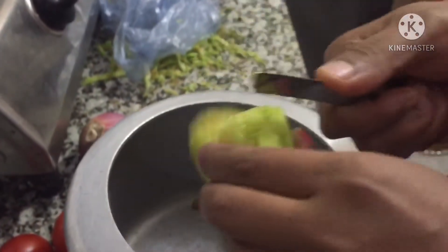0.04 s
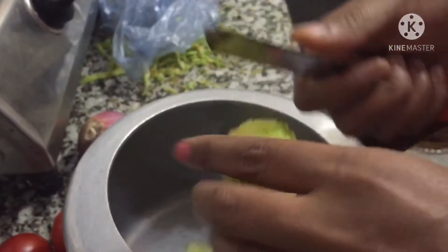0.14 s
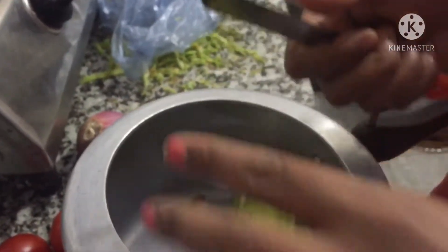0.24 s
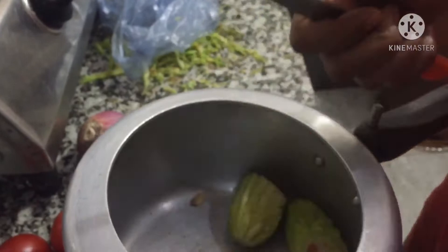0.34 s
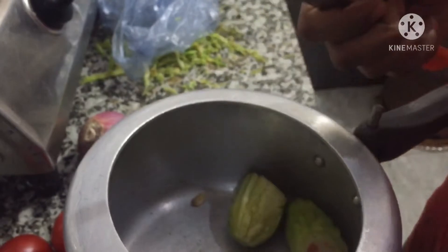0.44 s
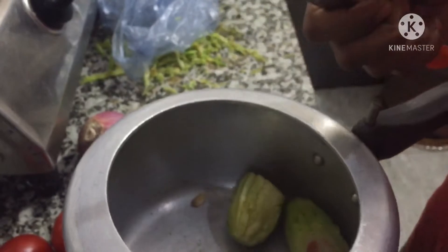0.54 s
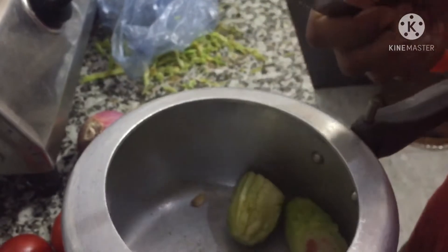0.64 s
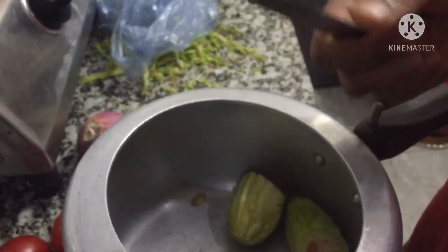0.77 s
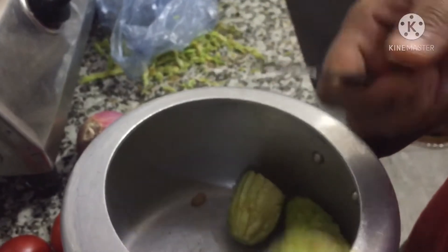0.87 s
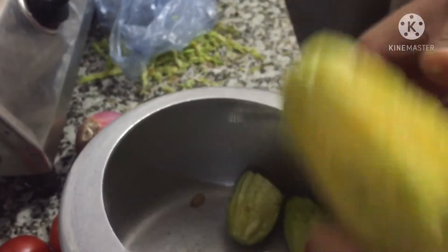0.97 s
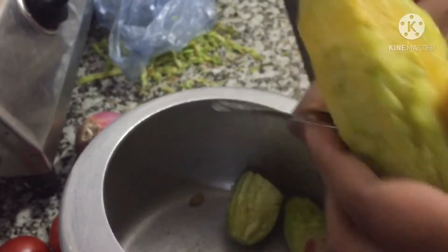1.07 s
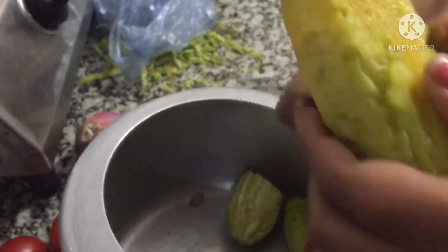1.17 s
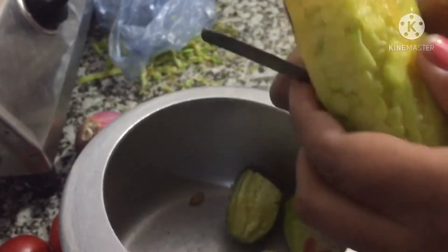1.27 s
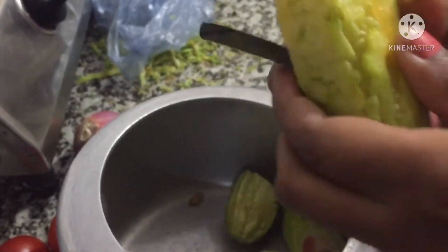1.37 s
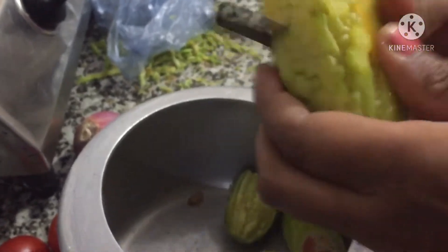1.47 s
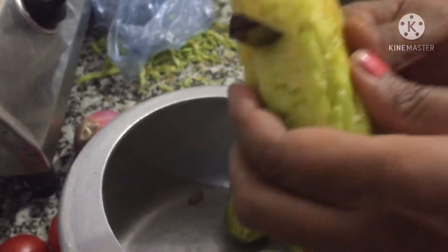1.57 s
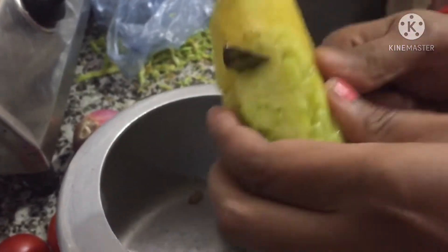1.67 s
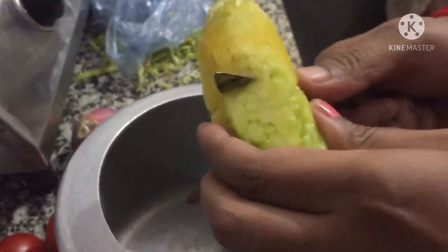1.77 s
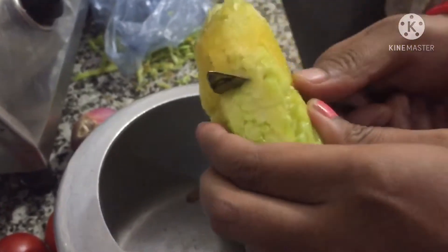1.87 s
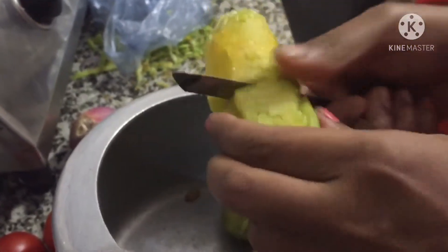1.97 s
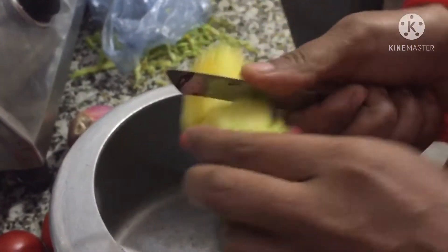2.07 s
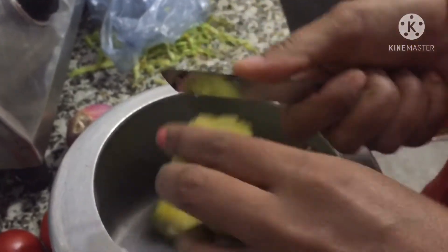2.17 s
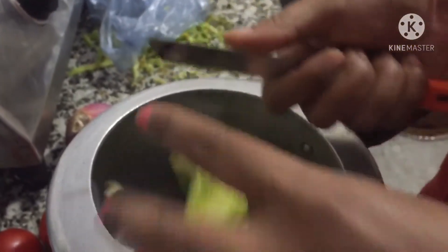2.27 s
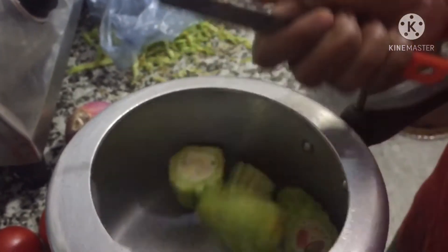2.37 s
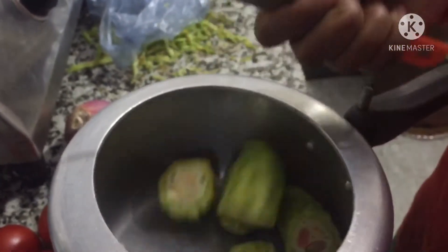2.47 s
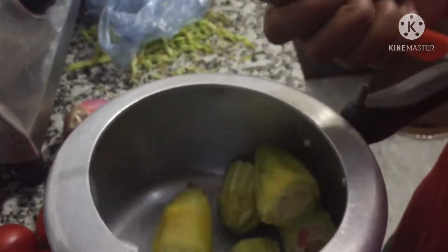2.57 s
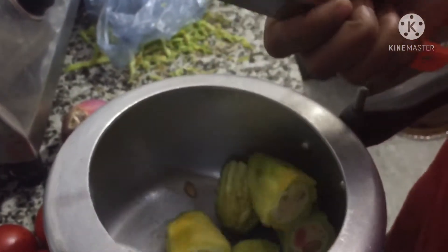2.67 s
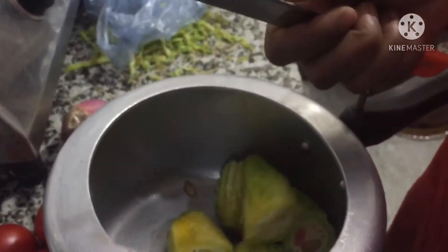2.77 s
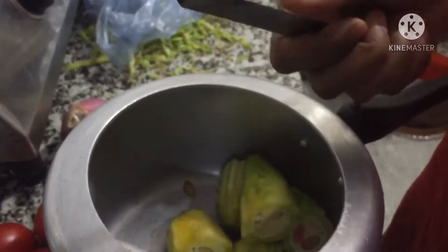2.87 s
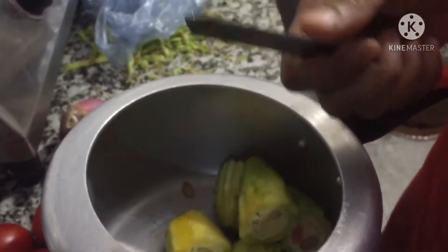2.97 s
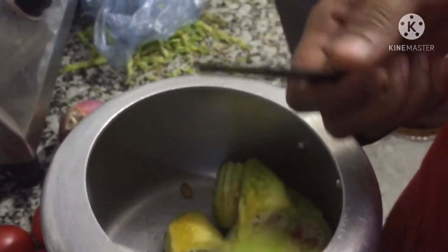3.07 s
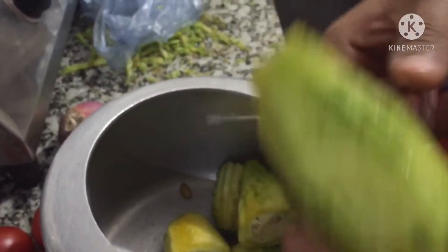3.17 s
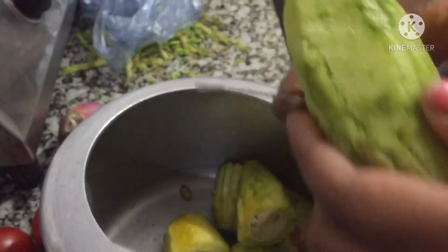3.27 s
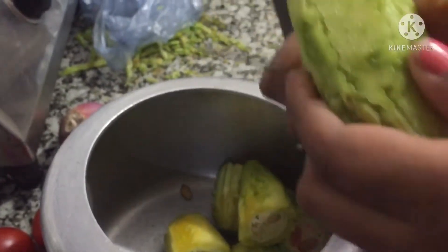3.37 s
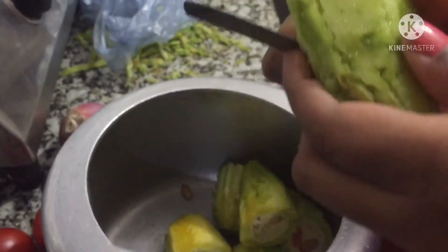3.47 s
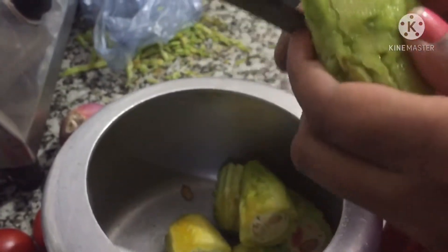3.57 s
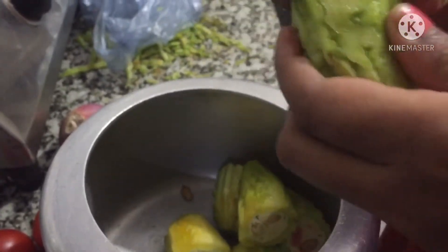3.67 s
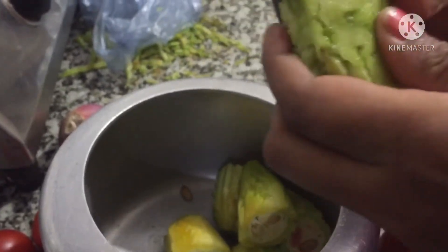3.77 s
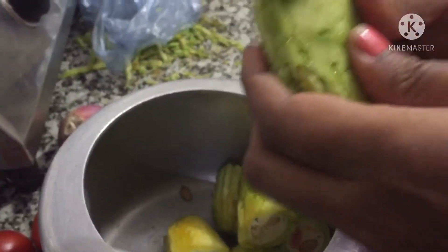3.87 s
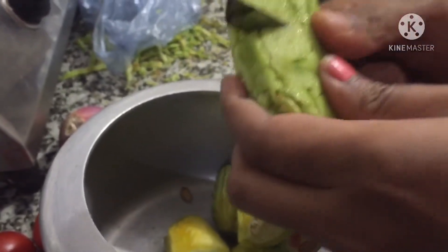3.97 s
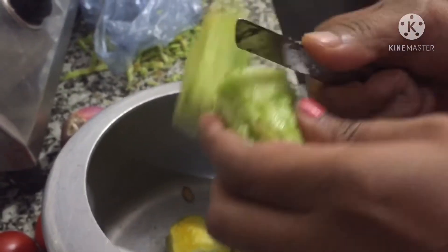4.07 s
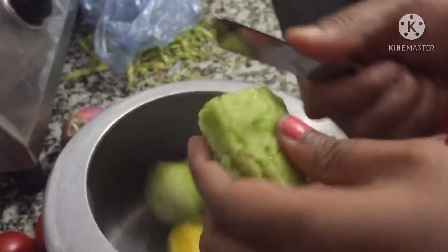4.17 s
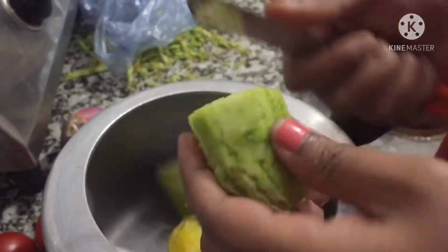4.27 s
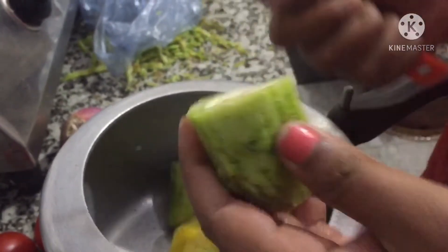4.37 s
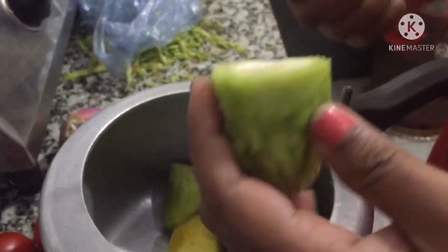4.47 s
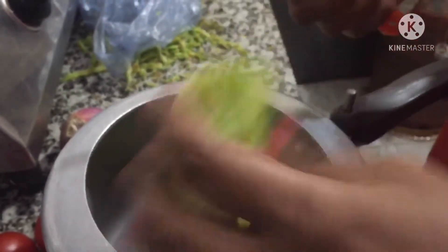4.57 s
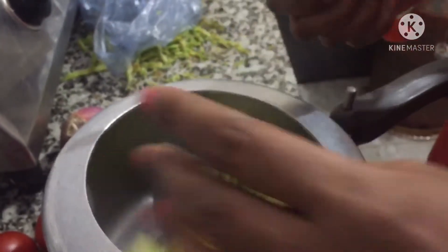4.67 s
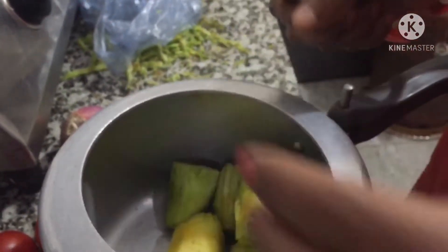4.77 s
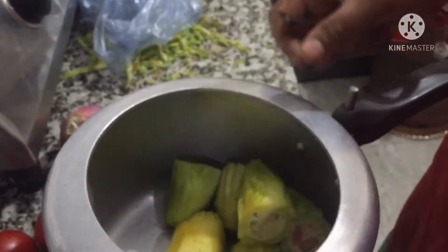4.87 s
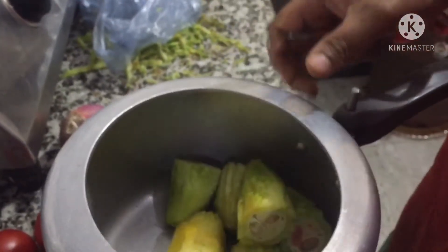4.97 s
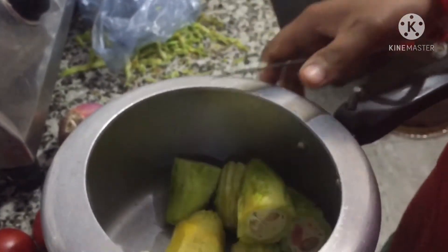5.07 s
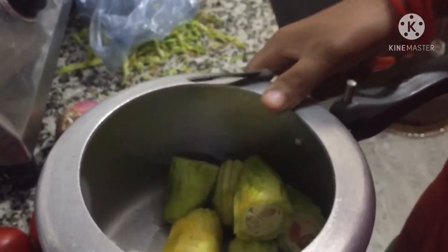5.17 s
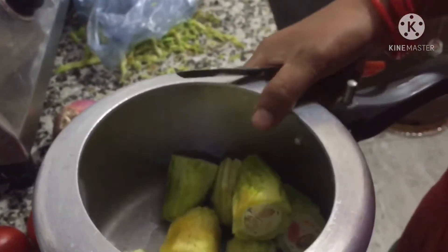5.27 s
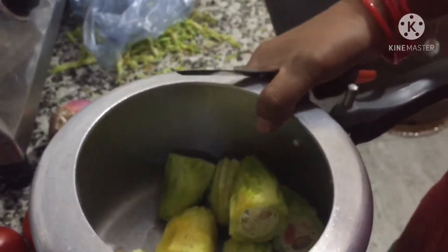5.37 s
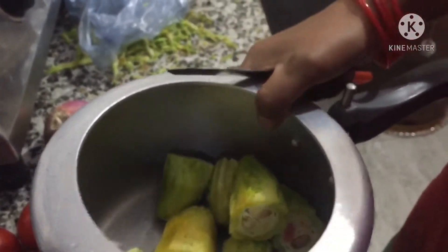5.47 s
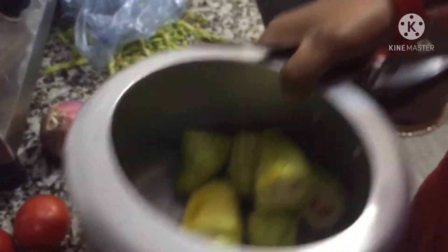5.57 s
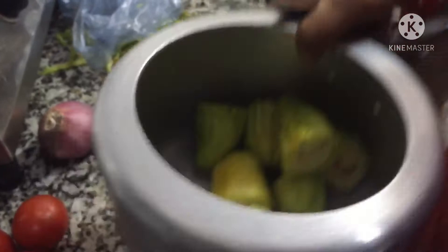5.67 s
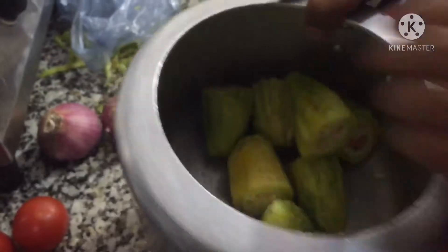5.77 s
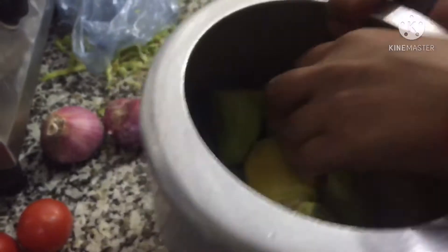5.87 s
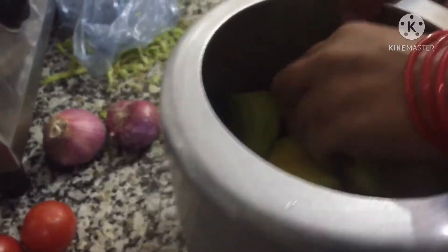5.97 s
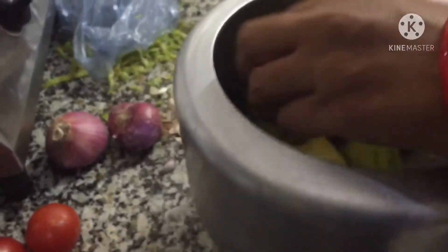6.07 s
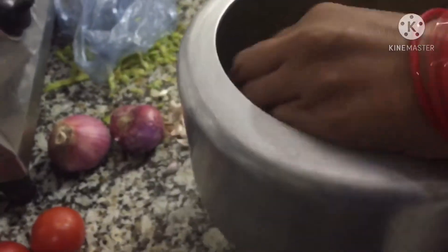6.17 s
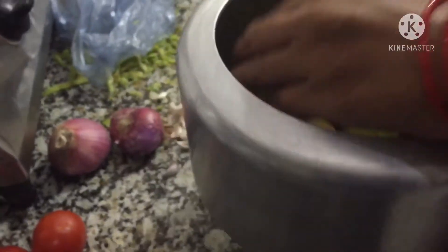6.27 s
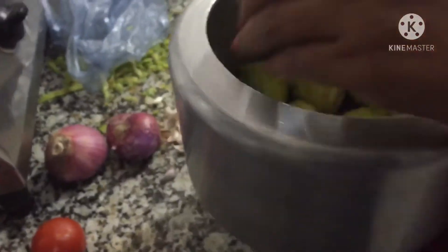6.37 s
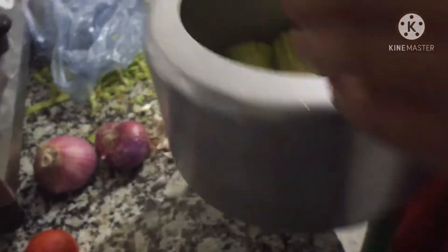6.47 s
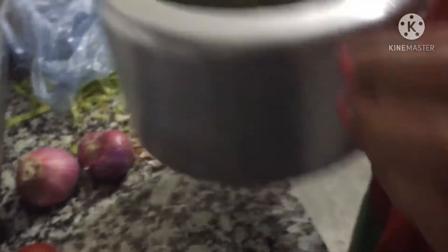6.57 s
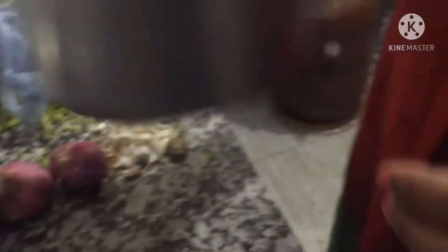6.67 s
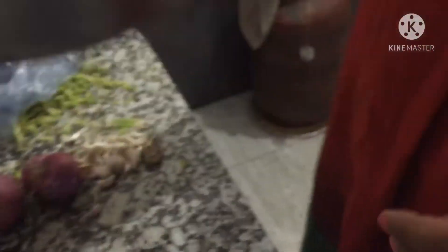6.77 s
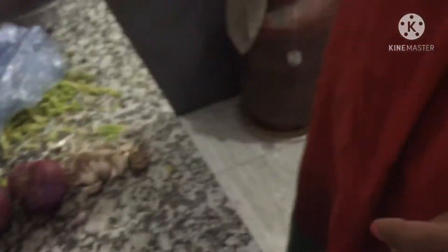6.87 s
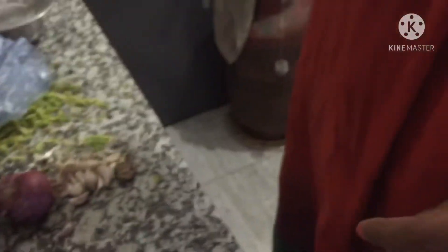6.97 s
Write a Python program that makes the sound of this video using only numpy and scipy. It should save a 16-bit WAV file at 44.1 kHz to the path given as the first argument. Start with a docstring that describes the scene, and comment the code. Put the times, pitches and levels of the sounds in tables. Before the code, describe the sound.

Close to the microphone in a small hard kitchen, a blade cracks and hisses through firm gourd. Chunks drop into an aluminium pot with hollow double thuds, and the pot rocks in quickening, fading knocks. Glass bangles tick and jingle with each hand movement. The knife taps the rim, then bangles slap the pot in a loud bright clatter. A low rumble wavers underneath.

```python
"""First a soft crack and hiss of a knife in gourd, over a low wavering rumble in a small kitchen.
Chunks drop into an aluminium pressure cooker and set it rocking; glass bangles tick at every move.
The knife is laid on the rim; then a hand reaches in to lift the pot and the bangles clatter on it.
Pot, glass and blade are sums of decaying modes, each with contact noise; flesh is shaped noise bursts
and a grainy hiss. A reverberant room answers, and a close phone saturates on the loudest blows."""
import sys
import numpy as np
from scipy import signal
from scipy.fft import rfft, irfft, next_fast_len
from scipy.io import wavfile
from scipy.ndimage import uniform_filter1d, map_coordinates

SR = 44100
rng = np.random.default_rng(int(sys.argv[2]) if len(sys.argv) > 2 else 0)


def materialize(psi):
    """Save the field psi as 16-bit PCM at rate SR to the path in sys.argv[1].

    A 1-D psi becomes a single channel; in a 2-D psi each row is a channel.
    """
    bounded = np.clip(np.atleast_2d(psi).T, -1, 1)
    quanta = np.round(bounded * 32767).astype(np.int16)
    wavfile.write(sys.argv[1], SR, quanta)


N = 310023
T = np.arange(SR * 2 // 5) / SR  # time axis of one contact, s

# Every level is relative: spectra and contacts are normalised, then weighted in the mix.
# room tone spectrum [f/Hz, density level/dB]
AIR = [(25, -31.5), (80, -4.5), (140, -1), (280, -14), (450, -30.5), (900, -31), (2200, -36), (4000, -38),
       (12000, -44), (16000, -52.5)]
# reverberation time of the kitchen [f/Hz, t60/s]
KITCHEN = [(100, 1), (300, 0.63), (1000, 0.42), (4000, 0.34), (16000, 0.18)]
# blade meeting the rim [t/s, level/dB]
RIM_TAPS = [(5.2412, -11.5)]
# modes of blade and rim together [f/Hz, level/dB, t60/s]
BLADE = [(1414, -13.5, 0.305), (2050, 2, 0.028), (3380, -14.5, 0.14), (3900, -4.5, 0.13), (4280, 0, 0.116),
         (4490, 1.5, 0.16), (6280, 0.5, 0.062), (11370, -13.5, 0.13), (14300, -10, 0.17)]
# bangles striking the pot [t/s, level/dB, length of the flurry/s]
SLAPS = [(6.0306, 5.5, 0.015), (6.0778, -5, .005), (6.107, -16.5, 0.0033), (6.266, -12, .02),
         (6.2845, -9, 0.017), (6.328, -18, 0.0073), (6.349, -19, .012), (6.387, -26.5, 0.0023),
         (6.408, -28, 0.004), (6.4954, -34.5, 0.0021)]
# modes of the pot's wall under a hard blow [f/Hz, level/dB, t60/s]
WALL = [(425, -7, .14), (1113, -10, .13), (1810, -15.5, 0.089), (3445, -11, 0.18), (4165, -7, 0.12),
        (4540, -13.5, .17), (5220, -7, 0.18), (6220, 0, 0.2), (6365, -1, 0.15), (6925, -6, .14),
        (8700, -8, .15), (9750, -4.5, .14), (11550, -11, .15), (15500, -12, 0.16), (15550, -11, 0.11)]
# flicks of the wrist that clink the bangles [t/s, level/dB, firmness as low ring over high ring/dB]
FLICKS = [(0.162, -25.5, -9), (0.228, -36.5, -32), (0.257, -28.5, -15), (0.439, -14.5, -7.5),
          (0.7605, -28, 2), (0.9057, -32, -37), (1.158, -34, -26), (1.244, -35.5, -7), (1.313, -21, -16),
          (1.383, -23, -1), (1.9506, -27.5, -32), (2.107, -29.5, -36), (2.1761, -27.5, -19),
          (2.281, -27.5, -32.5), (2.3778, -8.5, -0.5), (2.647, -29, -2), (2.741, -23, -13),
          (2.7778, -17, -9.5), (3.3674, -32.5, -35), (3.466, -20, -22), (3.486, -26.5, -1),
          (3.76, -26.5, -9.5), (3.813, -26.5, -38.5), (4.314, -18.5, -14.5), (4.361, -25.5, -1.5),
          (4.56, -19, -12.5), (4.787, -18.5, -8.5), (4.8135, -9, -15.5), (4.83, -14, -5.5),
          (4.8464, -13, -3.5), (5.1922, -20, -13.5), (5.3209, -24, -6.5), (5.811, -29, -4.5),
          (5.9315, -14, -12.5), (5.9874, -8.5, -18), (6.012, -7, -8.5), (6.1852, -21.5, -24),
          (6.276, -2, -21), (6.353, -18, -8), (6.9656, -20.5, -24)]
# modes of a small glass bangle [f/Hz, level/dB, t60/s]
BANGLE = [(1913, -18.5, 0.06), (5320, -6, 0.06), (6640, -5, 0.029), (9860, 4, 0.056), (16800, -1.5, 0.044)]
# chunks landing in the pot [t/s, knock level/dB, hardness as clack over knock/dB]
DROPS = [(0.286, -15, 4.5), (0.351, -34.5, -6), (0.43, -28, -2), (0.485, -13, 3), (2.372, -12, 2.5),
         (2.475, -20.5, -6.5), (2.528, -21, -14), (2.634, -22.5, 0), (2.657, -29, 4), (2.748, -19, -12),
         (4.35, -34, 4), (4.399, -32, -14), (4.487, -42, -18), (4.851, -20, -1)]
# the pot set rocking [t/s, first knock level/dB, first swing/s, loss per swing/dB, heel over knock/dB]
ROCKS = [(2.88, -16, .13, 4, -7), (4.448, -23, .069, 9, -11), (5.021, -15.5, .196, 8, -1),
         (5.561, -19, .19, 33, -8)]
# modes of the pot's body, loaded with chunks [f/Hz, level/dB, t60/s]
POT = [(80, -8, .25), (187, 1, .23), (232, -2, .16), (277, -2, .14), (455, 1, .08), (548, 0, .055),
       (745, -8, .045), (1150, -14, .06), (1550, -4, .028), (1690, 0, .028), (1785, 2, .036),
       (2420, -7, .02), (2880, -4, .024), (3420, -11, .03), (3950, -11, .022)]
# modes of the bare metal floor, before filling damps it [f/Hz, level/dB, t60/s]
FLOOR = [(1938, -14, .34), (2050, 0, .028), (2200, -4, .05), (2370, -2, .04), (2540, -3, .055),
         (2760, -5, .03), (3350, -7, .018), (4150, -10, .016)]
# dull noise of an impact on the pot [f/Hz, density level/dB]
THUMP = [(40, -32), (120, 11), (220, 1.5), (500, 13.5), (900, -19), (1600, 4.5), (2500, -6), (4200, -12.5),
         (15000, -32)]
# bright noise of hard contacts, metal or glass [f/Hz, density level/dB]
CRACK = [(30, -21), (400, -21), (2700, -0.5), (4200, -0.5), (6400, 0.5), (7700, 4), (10000, 0.5),
         (12500, 3.5), (16000, -10)]
# strokes of blade and fingers along the flesh [t/s at the height, level/dB, half length/s]
STROKES = [(0.035, -43.5, 0.033), (0.673, -53.5, .008), (1.037, -52, 0.04), (1.508, -54.5, .03),
           (1.826, -43.5, .075), (2.076, -43.5, 0.023), (2.79, -46, 0.042), (3.271, -56.5, .07),
           (3.752, -60, 0.064), (4.87, -48.5, 0.077), (5.627, -45.5, 0.024)]
# skin and flesh giving way under the blade [t/s, level/dB, treble over body/dB]
CUTS = [(0.019, -28, -4), (0.731, -23.5, -16.5), (0.745, -23, -18.5), (1.65, -16.5, -19),
        (1.694, -18.5, -21.5), (2.239, -31, 2), (3.779, -32, -17.5), (3.843, -19, -19),
        (3.95, -16.5, -15.5), (4.192, -34, -5)]
# wet cut faces skidding on each other or under the fingers [t/s, level/dB]
SKIDS = [(1.347, -40.5), (2.528, -29.5), (2.679, -25.5), (2.818, -41), (4.416, -29), (4.485, -33)]
# noise of cracking flesh [f/Hz, density level/dB]
FLESH = [(100, -12), (420, -8), (800, -6.5), (1500, -2.5), (2200, -8.5), (4000, -11), (8000, -6.5),
         (12000, -4), (16000, -15)]
# noise of slicing [f/Hz, density level/dB]
SLICE = [(200, -2), (700, -3.5), (1600, 0.5), (4000, -5), (12000, -7.5), (16000, -12.5)]

TOP_HZ = 16000  # band limit of the phone
WALL_LOW_GROWTH = 0.55  # dB of the wall's low ring per dB of the blow
JINGLE_S = .04  # time scale of loose jingling around a flick
# a large bangle rings lower and the arm chokes it sooner (ratios to the small one)
LARGE_PITCH, LARGE_LIFE = .91, 0.51
SIZE_SPREAD = .022  # relative pitch scatter among bangles of one kind
# the boom equals the knock at this level and grows more slowly (dB, dB per dB)
SOFT_DROP_DB, BOOM_GROWTH = -24, 0.46
# a chunk lands on an edge, then flops onto its side: delay, level and clack against the landing
FLOP_S, FLOP_DB, FLOP_CLACK_DB = .019, -12.5, -8.5
FILLING_DB_PER_S = 1  # piled chunks damp the floor more and more
SWING_SHRINK = .77  # each swing's duration over the one before
HEEL_S = 0.017  # the other side of the base follows each knock
# boom and clack over a rocking knock; under DULL_DB the clack falls away
ROCK_BOOM_DB, ROCK_CLACK_DB, DULL_DB = -7.5, -4.5, -21
# the blade slips on, catches and cracks again: interval, level over the cut, treble over the body
CATCH_S, CATCH_DB, CATCH_TREBLE_DB = .04, -15, -10
SLIP_DB = -29  # hiss of that slip against the crack
SKID_TREBLE_DB = -18  # over the body of a skid
# spread of size among bursting cells, and of the blade's progress
GRAIN_DB, UNEVEN_DB = 4.5, 3.8


def amp(db):
    """Decibels are a logarithmic measure of amplitude; return the gain."""
    return 10 ** (np.asarray(db) / 20)


def unit(x):
    """Normalise mean power: rms 1."""
    return x / np.sqrt(np.mean(x ** 2) + 1e-20)


def strong(x):
    """Normalise short-time power: the loudest 5 ms have rms 1."""
    return x / np.sqrt(uniform_filter1d(x ** 2, size=SR // 200).max() + 1e-20)


def along(points, hz):
    """Interpolate (frequency, value) points linearly on a logarithmic frequency axis."""
    f, v = np.transpose(points)
    return np.interp(np.log(hz + 1), np.log(f), v)


def filtered(x, response):
    """Linear filtering: multiply the spectrum of x by a response of frequency."""
    m = next_fast_len(len(x) + 8192)
    return irfft(rfft(x, m) * response(np.fft.rfftfreq(m, 1 / SR)), m)[:len(x)]


def band(x, kind, hz):
    """Causal third-order Butterworth low-, high- or band-pass."""
    return signal.sosfilt(signal.butter(3, hz, kind, fs=SR, output="sos"), x)


def noise(spectrum, size):
    """Coloured noise: white noise shaped by a spectrum, at rms 1."""
    return unit(filtered(rng.standard_normal(size), lambda hz: amp(along(spectrum, hz))))


def wobble(rate):
    """Slow fluctuation: a smooth curve through random knots, rate of them a second."""
    knots = rng.standard_normal(int(N * rate / SR) + 4)
    return map_coordinates(knots, [np.arange(N) * rate / SR])


def fade(t60):
    """Exponential decay, falling 60 dB in t60 seconds."""
    return amp(-60 * T / t60)


def ring(modes, scatter_db, spread, count):
    """Modal superposition: each mode is a cluster of partials; contact shifts the well-damped ones most."""
    hz, db, t60 = np.repeat(modes, count, axis=0).T
    size, shift, side = rng.standard_normal((3, len(hz)))
    pitches = hz + spread * shift / t60
    gains = np.sign(side) * amp(db + scatter_db * size)
    out = np.zeros(len(T))
    for f, gain, life in zip(pitches, gains, t60):
        t = T[T < 1.3 * life]
        onset = 1 - np.exp(-f * t)
        out[:len(t)] += gain * amp(-60 * t / life) * np.sin(2 * np.pi * f * t) * onset
    return strong(out)


def add(track, s, sound):
    """Superposition: mix a sound in at s seconds."""
    part = track[max(round(s * SR), 0):][:len(sound)]
    part += sound[:len(part)]


def room_tone(level_db, waver_db):
    """Amplitude modulation: a low rumble wavers under faint steady hiss."""
    air = noise(AIR, N)
    rumble = filtered(air, lambda hz: hz < 300)
    hiss = air - rumble
    waver = amp(waver_db * np.tanh(wobble(12)))
    return amp(level_db) * (rumble * waver + hiss)


def kitchen(x):
    """Reverberation: the small hard room's treble dies first; each quarter second gets a fresh tail."""
    out, step = np.zeros(N), SR // 4
    for start in range(0, N, step):
        hz, t, z = signal.stft(rng.standard_normal(len(T)), SR, nperseg=256)
        decay = amp(-60 * t / along(KITCHEN, hz)[:, None])
        tail = signal.istft(z * decay, SR, nperseg=256)[1][:len(T)]
        tail = tail * (1 - np.exp(-T / 0.0031))
        tail = tail / np.linalg.norm(tail)
        add(out, start / SR, signal.fftconvolve(x[start:start + step], tail))
    return out


def rim_tap(ring_db, crack_db):
    """Impact excitation: steel on aluminium gives a short crack and a clear ring."""
    out = np.zeros(N)
    for s, db in RIM_TAPS:
        crack = band(noise(CRACK, len(T)), "band", [1500, 10000]) * fade(0.028)
        steel = ring(BLADE, scatter_db=1, spread=0, count=1)
        add(out, s, amp(db) * (amp(ring_db) * steel + amp(crack_db) * crack))
    return out


def clatter(high_db, low_db, crack_db, count):
    """Contact damping: bangles slap the wall one after another and at once choke most of its ring."""
    out = np.zeros(N)
    damping = fade(.042) + amp(-15)
    for s, db, flurry in SLAPS:
        hit = np.zeros(len(T))
        delays = flurry / count * (np.arange(count) + rng.uniform(0, .5, size=count))
        for k, delay in enumerate(delays):
            rattle = amp(crack_db) * noise(CRACK, len(T)) * fade(.08)
            wall = ring(WALL, scatter_db=4, spread=10, count=2)
            add(hit, delay, amp(-2 * k) * (wall + rattle) * damping)
        add(out, s, amp(db + high_db) * strong(band(hit, "high", 2100)))
        add(out, s, amp(WALL_LOW_GROWTH * db + low_db) * strong(band(hit, "low", 3200)))
    return out


def chink(purity, large_db):
    """Shared excitation: a small and a large bangle touch and both ring, in shares that vary."""
    small, large = 1 + SIZE_SPREAD * np.clip(rng.standard_normal(2), -2, 1)
    small_modes = BANGLE * np.array([small, purity, 1])
    large_modes = BANGLE * np.array([large * LARGE_PITCH, purity, LARGE_LIFE])
    clear = ring(small_modes, scatter_db=4, spread=4, count=2)
    choked = ring(large_modes, scatter_db=4, spread=4, count=2)
    both = clear + amp(large_db + rng.normal(0, 6)) * choked
    onset = 1 - np.exp(-(T / .0006) ** 2)
    return strong(both * onset)


def stirring(level_db, growth, purity, large_db, count):
    """Random collisions: around each flick, and mostly after it, the loose bangles jingle."""
    out = np.zeros(N)
    for s, db, _ in FLICKS:
        for offset in JINGLE_S * rng.uniform(-.4, 1.5, size=count):
            gain = amp(growth * db + level_db + rng.uniform(-7, 4))
            add(out, s + offset, gain * chink(purity, large_db))
    return out


def bangles(high_db, low_db, rebound_db, stagger, large_db, count):
    """Force-dependent excitation: rings touch in turn and grate; firm flicks stir more, large ones too."""
    out = np.zeros(N)
    for s, db, low in FLICKS:
        tick = np.zeros(len(T))
        purity = np.clip(-db / 16, 1, 2)  # a light touch favours the strongest modes
        delays = stagger * np.array([0, *np.cumsum(rng.gamma(2, .5, size=count - 1))])
        for k, delay in enumerate(delays):
            grit = amp(-7 * purity) * noise(CRACK, len(T)) * fade(.025)
            gain = amp(rebound_db * purity * k + rng.normal(0, 2))
            add(tick, delay, gain * (chink(purity, large_db * purity) + grit))
        low_ring = band(band(tick, "low", 7500), "low", 7500)
        add(out, s, amp(db + high_db) * strong(band(tick, "high", 11000)))
        add(out, s, amp(db + low + low_db) * strong(low_ring))
    return out


def landings():
    """Double impact: each chunk lands and flops; yield (t/s, knock/dB, boom/dB, clack/dB)."""
    for s, db, clack in DROPS:
        boom = (BOOM_GROWTH - 1) * (db - SOFT_DROP_DB)
        yield s, db, boom, clack
        yield s + FLOP_S, db + FLOP_DB, boom, clack + FLOP_CLACK_DB


def rocking(count):
    """Energy loss: the pot rocks ever faster and softer, then duller; yields the same columns as landings."""
    for s, first_db, swing, loss, heel_db in ROCKS:
        for k in range(count):
            db = first_db - k * loss
            clack = ROCK_CLACK_DB + min(db - DULL_DB, 0)
            yield s, db, ROCK_BOOM_DB, clack
            yield s + HEEL_S, db + heel_db, ROCK_BOOM_DB, clack
            s += swing * SWING_SHRINK ** k


def thuds(boom_db, knock_db, clack_db, thump_db, contact_hz, floor_db, crack_db, lag):
    """Contact stiffness: harder hits on the pot clack higher and ring the bare floor more."""
    out = np.zeros(N)
    for s, db, boom, clack in [*landings(), *rocking(count=5)]:
        hard = amp(db + clack)
        thump = noise(THUMP, len(T)) * (fade(.03) + amp(-20) * fade(.26))
        hit = amp(thump_db) * thump + ring(POT, scatter_db=3, spread=1.1, count=1)
        reach_hz = np.clip(contact_hz * hard ** .25, 1500, 12000)
        clack_sound = band(band(hit, "high", 1300), "low", reach_hz)
        add(out, s, amp(clack_db) * hard * strong(clack_sound))
        # the filling lowers the floor's ring and shortens it
        free = amp(-FILLING_DB_PER_S * s)
        floor_modes = FLOOR * np.array([1, 1, np.sqrt(free)])
        metal = free * ring(floor_modes, scatter_db=2.5, spread=2.2, count=2)
        crack = noise(CRACK, len(T)) * (fade(.02) + amp(-12) * fade(.1))
        add(out, s, amp(floor_db) * hard ** 2 * (metal + amp(crack_db) * crack))
        # bending waves are slower at low pitch, so the boom comes last
        knock_sound = band(hit, "band", [340, 1100])
        boom_sound = band(hit, "band", [60, 330])
        add(out, s + lag / 4, amp(db + knock_db) * strong(knock_sound))
        add(out, s + lag, amp(db + boom + boom_db) * strong(boom_sound))
    return out


def skids():
    """Wet friction: short dull scuffs as (t/s, level/dB, treble/dB)."""
    return [(s, db, SKID_TREBLE_DB) for s, db in SKIDS]


def slicing(level_db):
    """Granular noise: the blade parts countless wet cells in a fine, grainy hiss."""
    t = np.arange(N) / SR
    slips = [(s + CATCH_S / 2, db + SLIP_DB, CATCH_S / 2) for s, db, _ in CUTS]
    force = sum(amp(db) / (1 + ((t - s) / half) ** 4) for s, db, half in [*STROKES, *slips])
    cells = rng.standard_normal(N) * amp(GRAIN_DB * wobble(2700) + UNEVEN_DB * wobble(99))
    hiss = unit(filtered(cells, lambda hz: amp(along(SLICE, hz))))
    return amp(level_db) * force * hiss


def cracks(count):
    """Stick-slip: each cut cracks, then catches more softly; yields (t/s, level/dB, treble/dB)."""
    for s, db, treble in CUTS:
        yield s, db, treble
        for k in range(1, count):
            yield s + k * CATCH_S, db + CATCH_DB * np.sqrt(k), CATCH_TREBLE_DB


def snaps(body_db, treble_db, length):
    """Fracture: a crack bursts a row of cells in a few milliseconds; skids use the same burst."""
    out = np.zeros(N)
    run = (1 - np.exp(-T / .0015)) * (np.exp(-(T / length) ** 4) + amp(-14) * fade(.07))
    for s, db, treble in [*cracks(count=3), *skids()]:
        # every crack opens its own cavity and so has its own colour
        colour = np.column_stack([np.geomspace(400, 12000, num=12), rng.normal(0, 3, size=12)])
        cells = filtered(noise(FLESH, len(T)), lambda hz: amp(along(colour, hz))) * run
        add(out, s, amp(db + body_db) * strong(band(cells, "low", 4320)))
        add(out, s, amp(db + treble + treble_db) * strong(band(cells, "high", 6800)))
    return out


def scene():
    """Superposition of direct sources, their reverberation and the room tone."""
    air = room_tone(level_db=-47, waver_db=6.0)
    metal = rim_tap(ring_db=-8.5, crack_db=-1.0)
    metal = metal + clatter(high_db=-5.5, low_db=-25.0, crack_db=-6.0, count=5)
    glass = stirring(level_db=-22.5, growth=0.96, purity=1.0, large_db=-5.5, count=3)
    glass = glass + bangles(high_db=-8.0, low_db=-11.0, rebound_db=-4, stagger=0.0065,
                            large_db=-3.5, count=4)
    pot = thuds(boom_db=3.0, knock_db=-6, clack_db=-3, thump_db=0.5, contact_hz=8200,
                floor_db=9.5, crack_db=-15, lag=0.00494)
    knife = slicing(level_db=1.5) + snaps(body_db=-5.0, treble_db=0.5, length=0.0088)
    wet = kitchen(amp(-12.0) * pot + amp(-17.0) * glass + amp(-12.5) * metal + amp(-13) * knife)
    return (pot + glass + metal + knife + wet + air)[None]


def record(dry):
    """Soft saturation: the phone rounds off the loudest blows, then cuts steeply at its band limit."""
    ceiling = 1.05 + .04 * np.sign(dry[0])  # slightly lopsided
    clipped = dry[0] / (1 + np.abs(dry[0] / ceiling) ** 6) ** (1 / 6)
    return filtered(clipped, lambda hz: 1 / (1 + (hz / TOP_HZ) ** 120))[None]


dry = scene()
out = record(dry)
materialize(out)
```